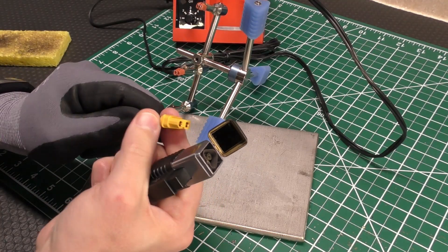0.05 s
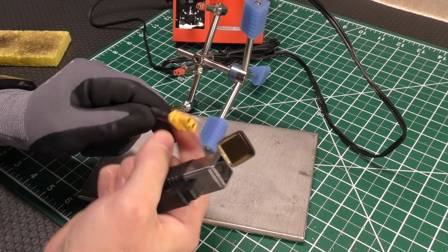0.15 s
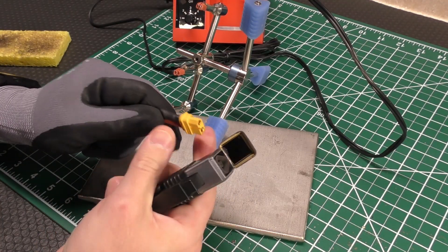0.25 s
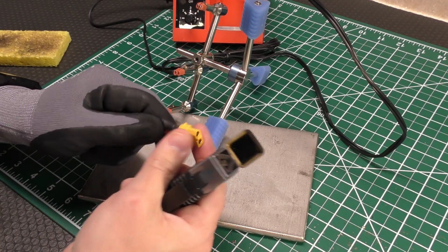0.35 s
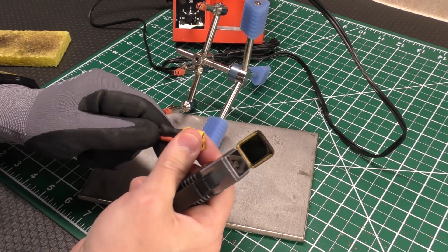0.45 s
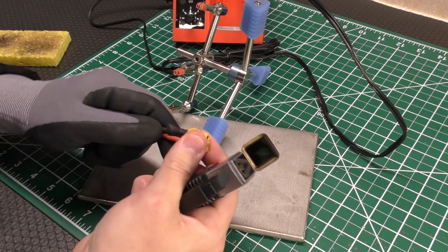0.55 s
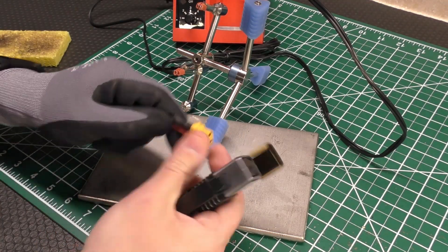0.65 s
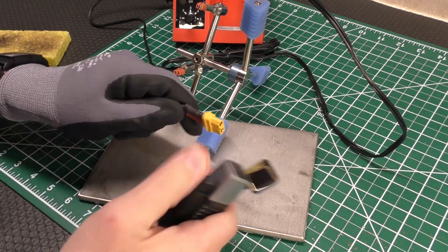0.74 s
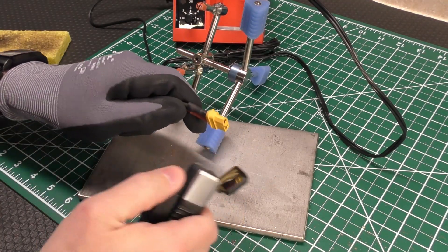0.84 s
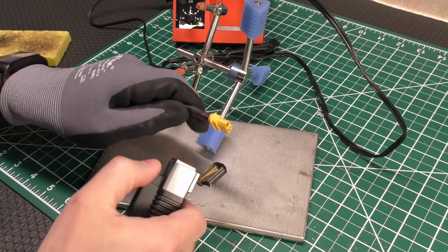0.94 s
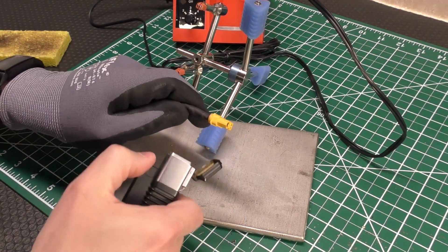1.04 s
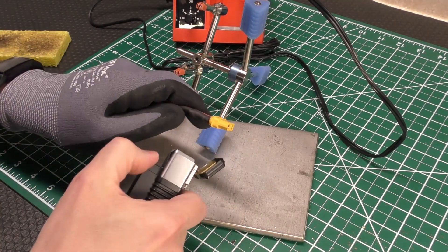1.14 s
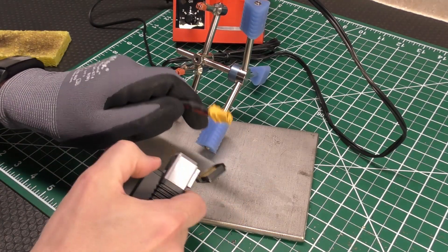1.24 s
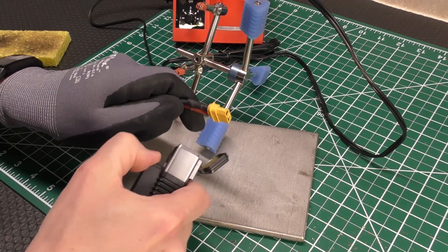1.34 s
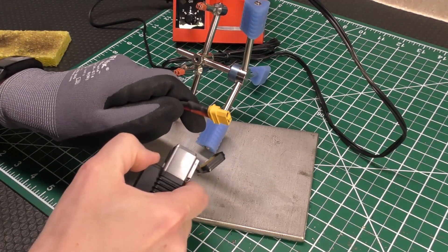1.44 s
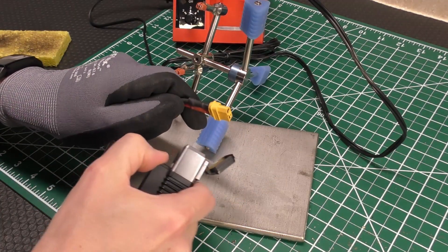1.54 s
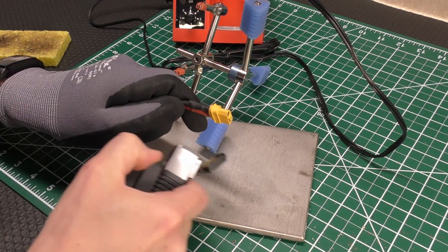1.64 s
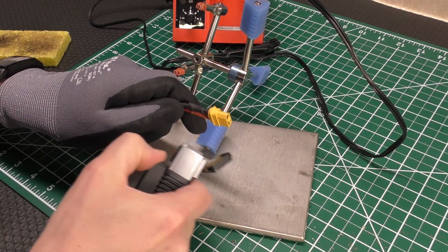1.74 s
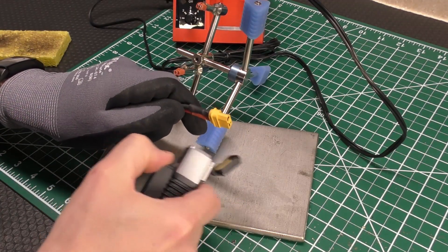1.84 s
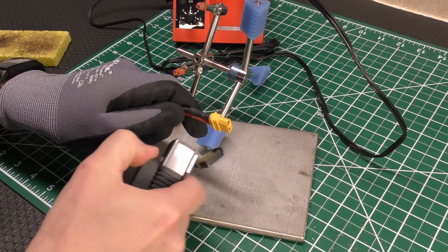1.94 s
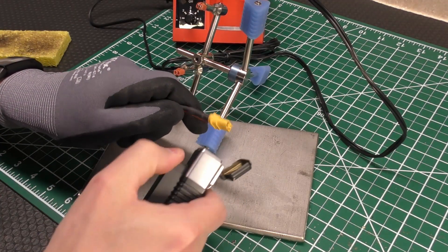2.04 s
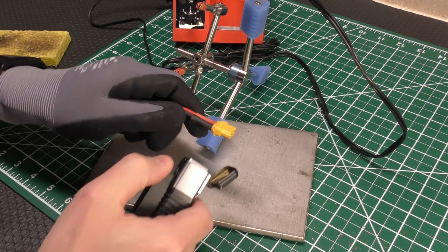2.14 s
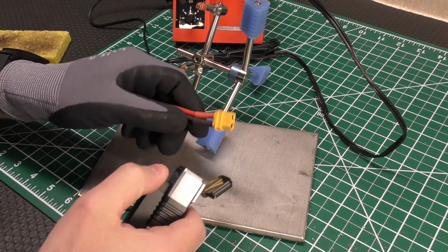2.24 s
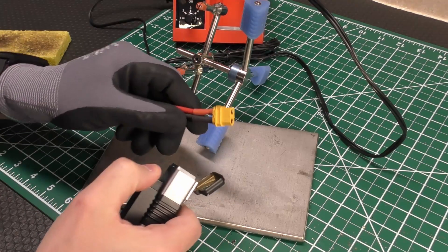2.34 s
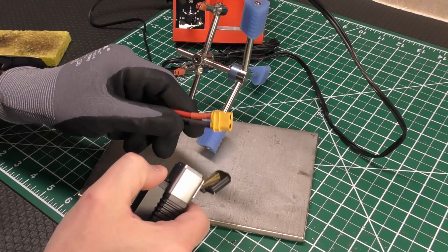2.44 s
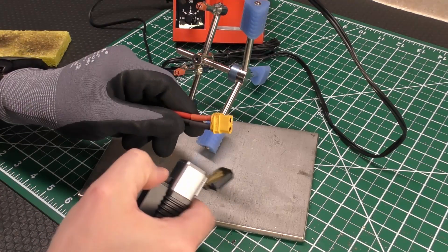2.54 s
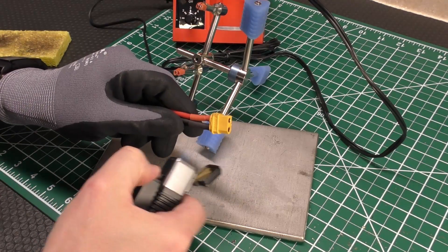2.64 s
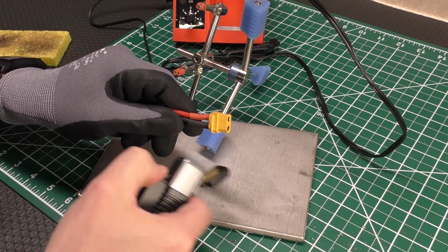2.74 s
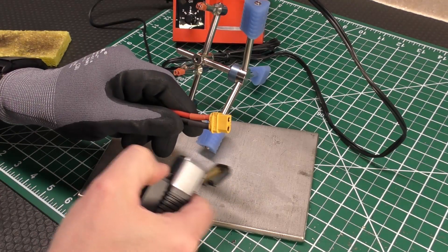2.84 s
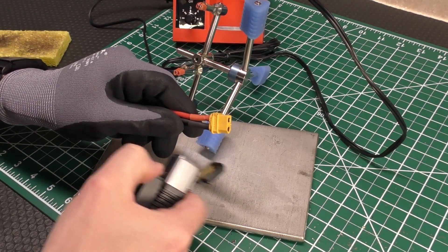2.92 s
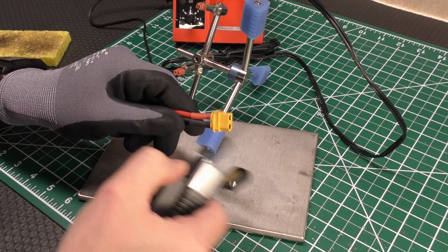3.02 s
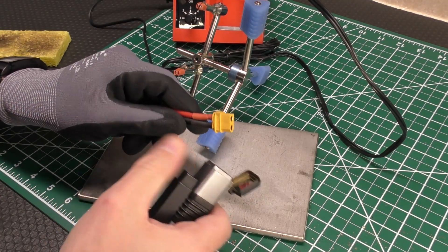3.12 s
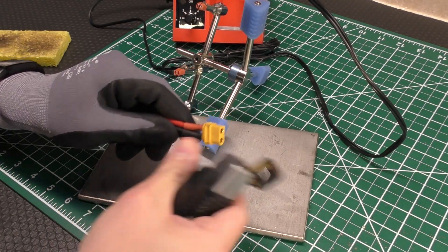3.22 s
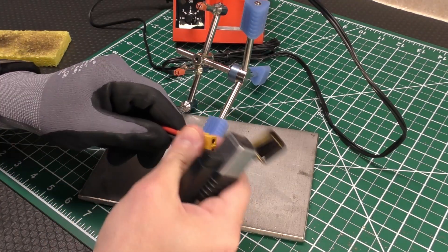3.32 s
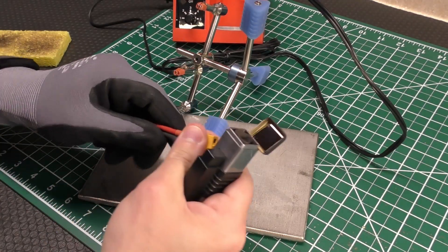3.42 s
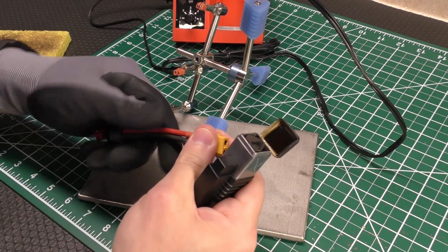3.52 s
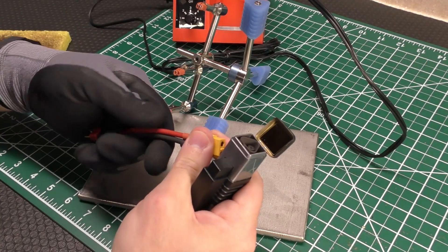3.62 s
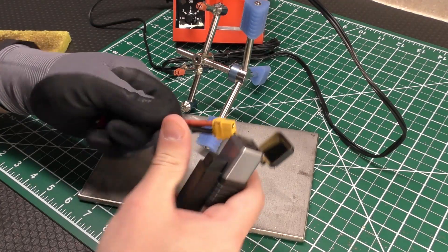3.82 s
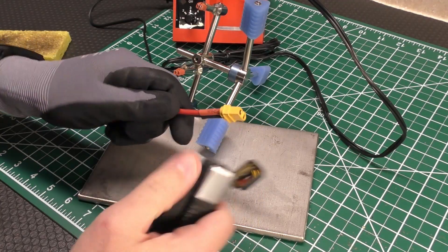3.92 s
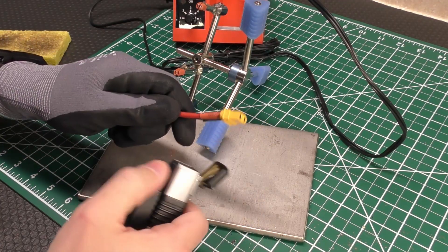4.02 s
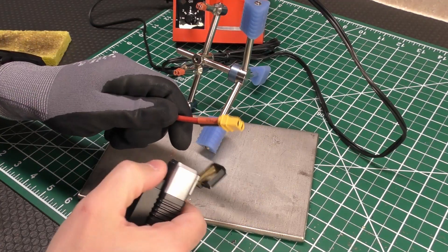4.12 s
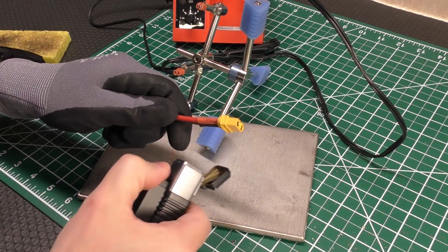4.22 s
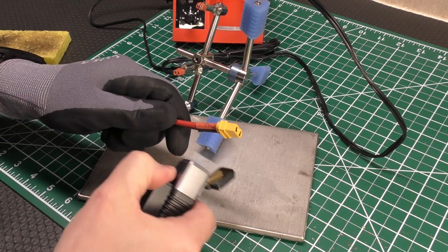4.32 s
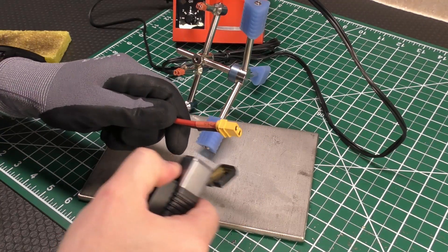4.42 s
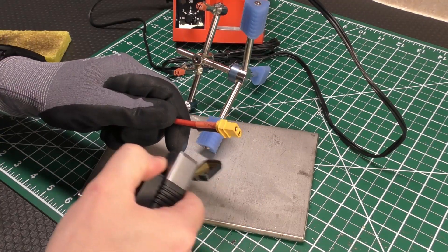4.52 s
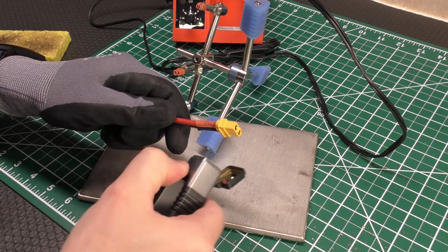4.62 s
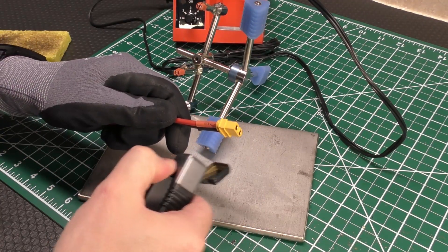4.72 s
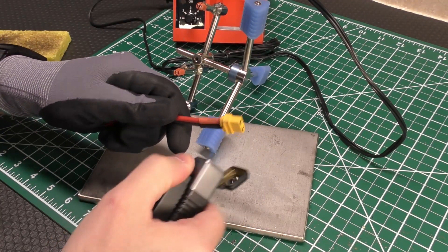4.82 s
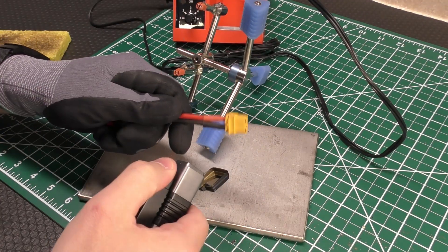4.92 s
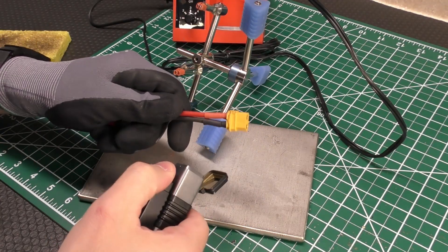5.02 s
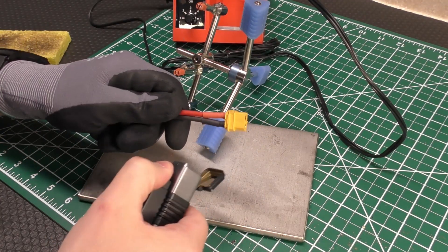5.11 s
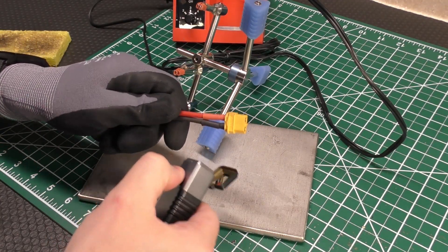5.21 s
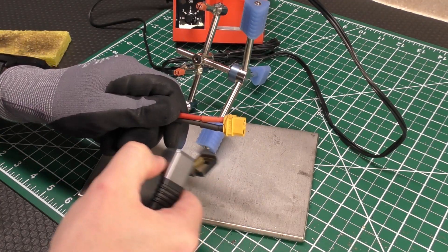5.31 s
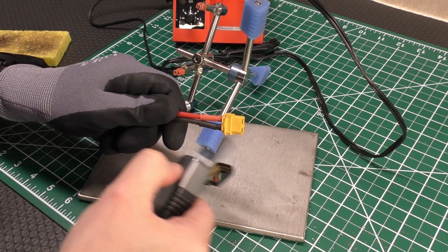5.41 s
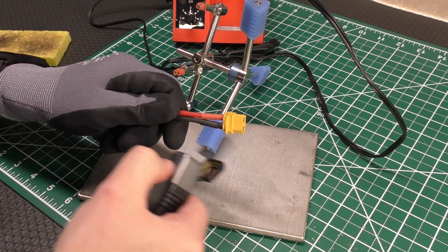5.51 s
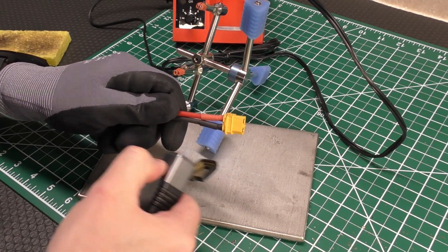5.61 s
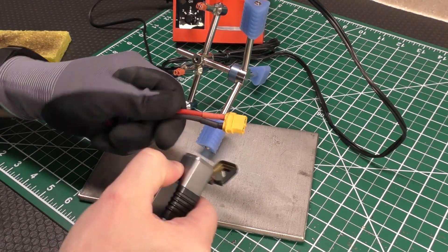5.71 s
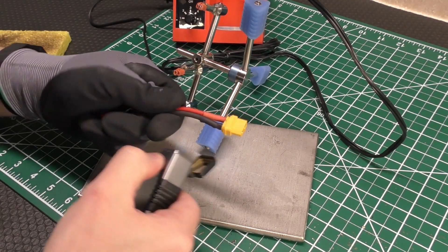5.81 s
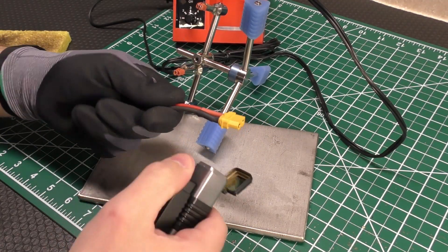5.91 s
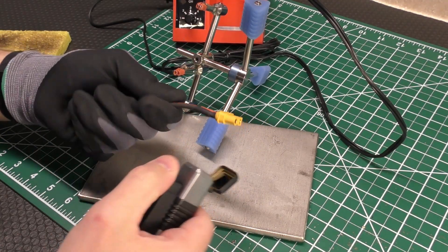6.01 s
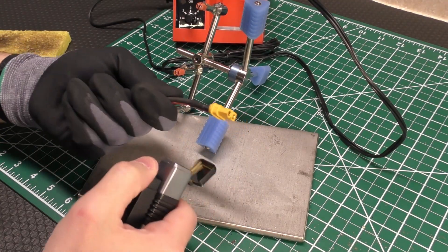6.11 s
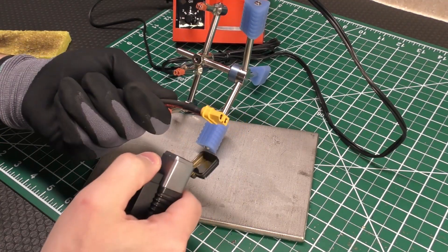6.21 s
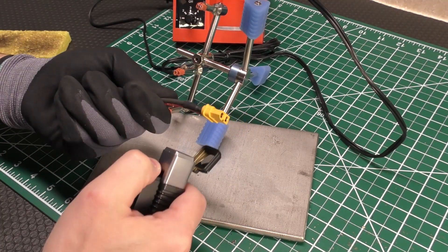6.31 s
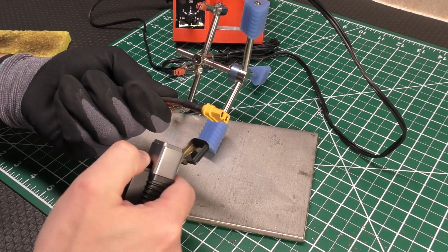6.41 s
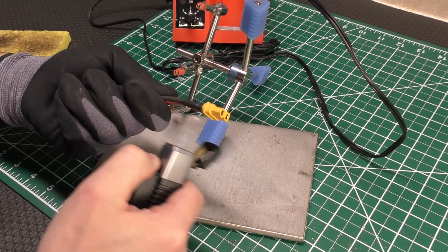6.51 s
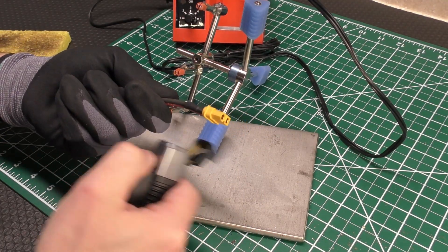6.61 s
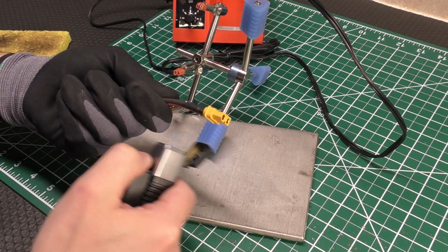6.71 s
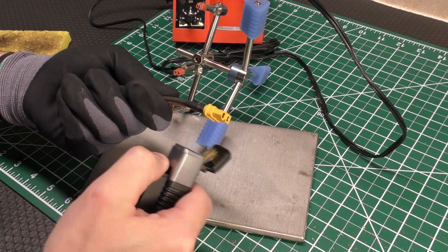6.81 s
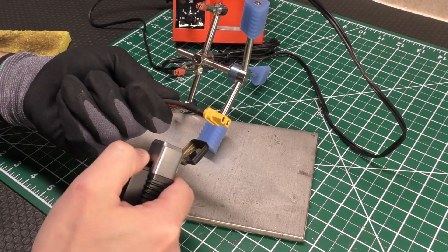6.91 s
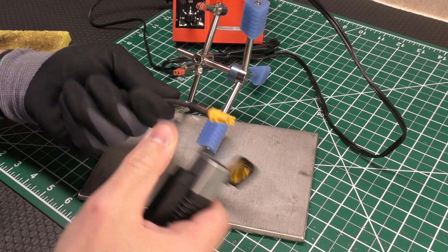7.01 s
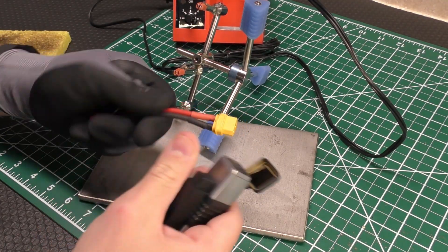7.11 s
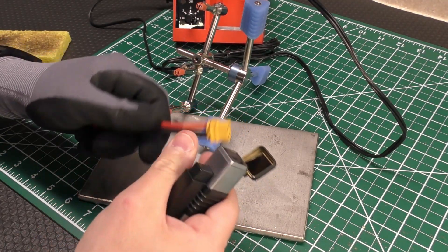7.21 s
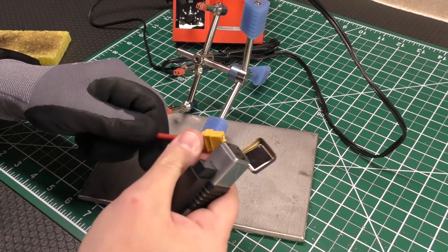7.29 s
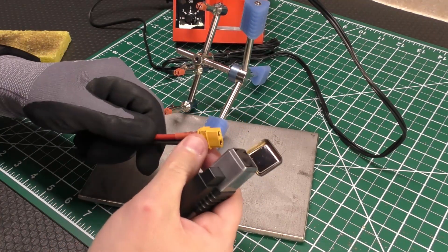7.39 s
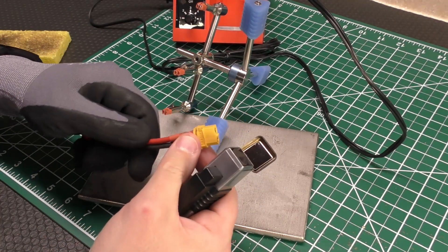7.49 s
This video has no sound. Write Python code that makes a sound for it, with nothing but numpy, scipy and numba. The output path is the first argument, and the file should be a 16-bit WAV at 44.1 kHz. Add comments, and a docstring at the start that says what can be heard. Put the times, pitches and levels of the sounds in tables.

```python
"""The jet flame of a torch lighter rushes and hisses over a workbench, close by, in five burns that shrink tubing.
Flame and gas are coloured turbulence noise; the hand swings the jet about six times a second, and it grows louder
and brighter at each pass over the connector. Each press snaps the piezo hammer (damped modes and noise bursts) and
the gas lights with a soft pop; each release clacks. Fabric rubs, a squeak, grip ticks, a fan and mains hum (noise
and sines) join in. The snaps scatter, a small room rings, and a limiter ducks the peaks."""
import sys
import numpy as np
from scipy import signal
from scipy.fft import rfft, irfft, next_fast_len
from scipy.io import wavfile
from scipy.ndimage import uniform_filter1d, minimum_filter1d, map_coordinates
from numba import njit

SR = 44100
rng = np.random.default_rng(int(sys.argv[2]) if len(sys.argv) > 2 else 0)


def to_wav(sig):
    """Store sig (one row per channel, or 1-D mono) as 16-bit WAV at the path in sys.argv[1].

    Samples outside -1..1 are clipped; the rate is SR.
    """
    pcm = np.clip(np.atleast_2d(sig), -1, 1) * 32767
    pcm = np.round(pcm).astype(np.int16)
    wavfile.write(sys.argv[1], SR, pcm.T)  # frames by channels


N = 332955
TIME = np.arange(N) / SR  # seconds
HIT = np.arange(4096) / SR  # time within one short blow, seconds

# Trigger pressed, the piezo hammer strikes. Each row: time in seconds, level in dB, pitch ratio of the case,
# hardness in dB, ping of the spring in Hz, ping level in dB.
HAMMER_STRIKES = [(1.3892, -5, 1.055, -1.5, 3100, -19), (2.562, -7, 1.055, 1.5, 2900, -29),
                  (4.3206, -5.5, 1.007, -1.5, 3930, -30), (5.255, -7.5, 1, 2.5, 1630, -22),
                  (6.3623, -5.5, 1.016, 0.5, 3380, -16)]
# Trigger let go, the valve shuts. Each row: time in seconds, level in dB, pitch ratio of the case,
# hardness in dB, ping of the spring in Hz, ping level in dB.
VALVE_CLOSINGS = [(2.1139, -23, 1.04, 1, 5120, -32), (3.1267, -28.5, 0.89, 5.5, 4180, -33),
                  (4.8930, -22, 1.18, -2, 5240, -26.5), (5.9110, -26.5, 0.94, 3, 4600, -25.5),
                  (7.0298, -21, 0.94, -2, 1650, -26)]


def undb(db):
    """Level law: decibels become an amplitude gain."""
    return 10 ** (np.asarray(db) / 20)


def unit(x):
    """Normalization: scale to rms 1."""
    return x / np.sqrt(np.mean(x ** 2))


def colour(x, points):
    """Minimum-phase filtering: folding the cepstrum makes the (Hz, dB) outline a causal filter."""
    size = next_fast_len(len(x) + len(HIT)) * 2
    hz, db = np.transpose(points)
    log_bins = np.log(np.fft.rfftfreq(size, 1 / SR) + 1)
    log_gain = np.log(undb(np.interp(log_bins, np.log(hz), db)))
    cepstrum = irfft(log_gain)
    cepstrum[1:size // 2] *= 2
    cepstrum[size // 2 + 1:] = 0
    response = np.exp(rfft(cepstrum))
    return irfft(rfft(x, size) * response)[:len(x)]


def noise(points):
    """Broadband source: white noise filtered to the (Hz, dB) outline, at rms 1."""
    return unit(colour(rng.standard_normal(N), points))


def walk(rate):
    """Slow fluctuation: random steps, rate per second, smoothed by a moving average to a spread near 1."""
    k = int(SR / rate)
    steps = np.repeat(rng.standard_normal(N // k + 1), k)
    return unit(uniform_filter1d(steps, k)[:N])


def stereo(mid, side):
    """Mid-side matrix: left is the sum, right the difference."""
    return np.array([mid + side, mid - side])


def add(track, s, sound):
    """Superposition: mix a sound in at a time in seconds."""
    i = int(s * SR)
    track[i:i + len(sound)] += sound[:N - i]


def burst(t60, t=HIT):
    """Exponential decay: noise that falls 60 dB in t60 seconds, with energy 1."""
    x = rng.standard_normal(len(t)) * undb(-60 * t / t60)
    return x / np.linalg.norm(x)


def gate(start, stop, rise, fall):
    """Linear envelope: 1 between two times, with sloping edges centred on them."""
    opening = np.clip((TIME - start) / rise + .5, 0, 1)
    closing = np.clip((stop - TIME) / fall + .5, 0, 1)
    return opening * closing


def background(air_db=-59, fan_db=-61, hum_db=-1, waver_db=-1.0, spread=0.47):
    """Steady noise and tones: a fan's low rush, thin air noise, and motor and mains tones that waver."""
    # Colour of the room air. Each row: frequency in Hz, level in dB.
    air_colour = [(25, -42), (48, 3.5), (80, -13.5), (120, 3.5), (180, -13), (250, -5.5), (470, -9.5),
                  (650, -18), (1190, -9.5), (2400, -15.5), (4000, -21.5), (6500, -35.5), (11500, -25.5),
                  (16000, -31)]
    # Colour of the fan's low rush. Each row: frequency in Hz, level in dB.
    fan_colour = [(60, -18), (110, -10), (220, -4.5), (330, -2.5), (480, -7), (560, -22.5), (800, -33)]
    # Mains and motor tones. Each row: frequency in Hz, level in dB before the common shift.
    hum_tones = [(59.2, -66), (118.4, -70), (150.7, -70.5), (220.7, -64.5), (301.5, -68.5), (479.1, -69),
                 (1168, -74.5)]
    mid, side = (undb(air_db) * noise(air_colour) + undb(fan_db) * noise(fan_colour) for _ in range(2))
    hum = 0
    for hz, db in hum_tones:
        level = undb(db + hum_db + waver_db * walk(5))
        hum = hum + level * np.sin(2 * np.pi * hz * TIME + .5 * walk(6))
    return stereo(mid + np.sqrt(2) * hum, spread * side)  # sqrt(2) turns tone levels into rms


def room(x, wet_db=-12, t60=0.46, side_db=-13):
    """Reverberation: steadier sounds convolved with decaying noise, the short ring of the walls."""
    mid, side = (signal.fftconvolve(x, burst(t60, TIME[:SR // 2]))[:N] for _ in range(2))
    return stereo(x + undb(wet_db) * mid, undb(side_db) * side)


def scatter(x, near_db=-12, near_t60=0.036, far_db=-16, far_t60=0.48, gap=0.0036, spread=0.46):
    """Diffuse scattering: a noise wash follows a snap's energy, quick off the bench, slower off the walls."""
    # Colour of a snap scattered by the bench and the walls. Each row: frequency in Hz, level in dB.
    wash_colour = [(300, -23), (800, -14), (1200, -5.5), (1550, 9), (2200, 4.5), (2700, 2.5), (3500, 2),
                   (5200, -2.5), (6300, 4), (7500, -2.5), (8700, -2.5), (9400, -3.5), (11500, -3.5),
                   (13700, -7), (16000, -15)]
    t = TIME[:SR // 2]
    near, far = undb(-120 * t / near_t60), undb(-120 * t / far_t60)  # energy, hence the doubled dB
    decay = undb(2 * near_db) * near / near.sum() + undb(2 * far_db) * far / far.sum()
    delayed_decay = np.pad(decay, (int(gap * SR), 0))
    energy = signal.fftconvolve(x ** 2, delayed_decay)[:N]
    wash = np.sqrt(np.abs(energy))
    return stereo(x + wash * noise(wash_colour), spread * wash * noise(wash_colour))


def ports(pair, lag=0.34, pan_db=0.9):
    """Interaural-style cues: the case is nearer the left microphone port, louder and lag samples earlier there."""
    right = map_coordinates(pair[1], [np.arange(N) - lag], order=3)
    return np.array([pair[0] * undb(pan_db / 2), right * undb(-pan_db / 2)])


def squeak(jitter=0.0083, rough_db=3):
    """Frequency modulation: as the grip changes, one thin unsteady tone arcs up and down."""
    # Path of the tone. Each row: time in seconds, pitch in Hz, level in dB.
    squeak_path = [(.58, 11700, -84), (.62, 12400, -77), (.71, 13400, -71), (.78, 12800, -65),
                   (.85, 11900, -66), (.89, 11400, -86)]
    s, hz, db = np.transpose(squeak_path)
    pitch = np.interp(TIME, s, hz) * (1 + jitter * walk(500))
    level = undb(np.interp(TIME, s, db) + rough_db * walk(60))
    phase = 2 * np.pi * np.cumsum(pitch) / SR
    return gate(s[0], s[-1], .02, .02) * level * np.sin(phase)


def rubs(grain_db=3):
    """Friction noise: glove and fingers on wire and case give short grainy swishes and duller scuffs."""
    # Strokes. Each row: start in seconds, length in seconds, swish level in dB, dull scuff level in dB.
    strokes = [(0.149, 0.056, -54, -69), (0.19, 0.082, -57, -80), (.67, 0.089, -66, -64),
               (1.24, 0.086, -61, -59), (3.494, 0.099, -72, -56.5), (3.82, .06, -67, -80),
               (7.34, 0.08, -65, -76.5)]
    # Colour of the swish. Each row: frequency in Hz, level in dB.
    swish_colour = [(1760, -48), (3000, -13), (4140, -3.5), (5330, -6), (7000, -0.5), (12100, -5),
                    (16000, -9)]
    # Colour of the scuff. Each row: frequency in Hz, level in dB.
    scuff_colour = [(500, -39), (1300, -2), (1900, 2), (2600, 1), (4000, -12), (9000, -24)]
    swish, scuff = np.zeros((2, N))
    for s, length, swish_db, scuff_db in strokes:
        stroke = np.hanning(int(length * SR))
        add(swish, s, undb(swish_db) * stroke)
        add(scuff, s, undb(scuff_db) * stroke)
    grain = unit(undb(grain_db * walk(600)))
    return (swish * noise(swish_colour) + scuff * noise(scuff_colour)) * grain


def snaps(table, crack_db, crack_t60, rattle_db, rattle_t60, steel_db):
    """Impact excites modes: the damped case rings briefly, metal cracks, the spring rattles, steel rings on."""
    # Modes of the hand-damped case. Each row: frequency in Hz, swell time in seconds, level in dB.
    case_modes = [(1694, 0.00079, 0.5), (2320, 0.00057, -4), (3107, 0.00063, -4.5), (3660, 0.0005, -8),
                  (4940, 0.0004, -6.5), (6670, 0.0012, -20.5), (9860, 0.00023, -23), (11240, 0.00024, -1)]
    # Colour of the crack of the metal parts. Each row: frequency in Hz, level in dB.
    crack_colour = [(300, -27), (900, -13), (1500, -20), (3200, -4), (4200, -0.5), (5400, -4), (6500, -0.5),
                    (7600, -3.5), (9000, -1), (12000, -4), (13000, -6), (15500, -9), (17000, -3.5)]
    # Thin steel parts. Each row: frequency in Hz, level in dB, 60 dB decay time in seconds.
    steel_modes = [(1450, -22, .04), (2060, 5, 0.095), (2120, -12, 0.036), (3500, -15, .05),
                   (5080, 8, 0.044), (5860, -17, .15), (6500, -14, .15), (6900, -24, 0.12),
                   (7260, -11, .13), (8380, 1, .1), (8930, -22, .1), (11900, 9, .06)]
    out = np.zeros(N)
    contact = 1 - np.exp(-HIT / 0.00021)  # softens the onset of the crack
    t = TIME[:SR // 4]
    for s, db, pitch, hardness_db, *_ in table:
        ring = 0  # a harder contact lifts the high modes and the crack
        for k, (hz, swell, mode_db) in enumerate(case_modes):
            shape = (HIT / swell * np.exp(1 - HIT / swell)) ** 2
            level = undb(mode_db + hardness_db * hz / case_modes[-1][0])
            ring = ring + (-1) ** k * level * shape * np.sin(2 * np.pi * hz * pitch * HIT)
        steel = 0
        for hz, mode_db, t60 in steel_modes:
            level = undb(mode_db + 2 * rng.standard_normal() - 60 * t / t60)
            steel = steel + level * np.sin(2 * np.pi * (hz * t + rng.random()))
        metal = undb(crack_db) * burst(crack_t60) * contact + undb(rattle_db) * burst(rattle_t60)
        add(out, s, undb(db) * (ring + undb(hardness_db) * colour(metal, crack_colour)))
        add(out, s, undb(db + steel_db) * steel)
    return out


def pings(table, t60):
    """Damped free oscillation: the trigger spring gives one short note, its own for each snap."""
    out = np.zeros(N)
    for s, *_, hz, db in table:
        add(out, s, undb(db - 60 * HIT / t60) * np.sin(2 * np.pi * hz * HIT))
    return out


def grip_ticks():
    """Weak impacts: the case ticks as the grip shifts, and the trigger slips just before every release."""
    # Ticks of the case. Each row: time in seconds, level in dB, pitch ratio of the case, hardness in dB.
    shifts = [(.859, -43, 0.93, 0), (1.2655, -53, 0.88, 17), (4.0012, -39, 0.93, -8.5),
              (4.0765, -43, 1.45, -21), (5.114, -43.5, 1.08, -25), (6.199, -50.5, 1, -15.5),
              (6.2635, -43.5, 1.07, -20)]
    slip_lead_s, slip_db, slip_hardness_db = .038, -53, 14
    slips = [(s - slip_lead_s, slip_db, 1, slip_hardness_db) for s, *_ in VALVE_CLOSINGS]
    return snaps(shifts + slips, crack_db=15, crack_t60=0.019, rattle_db=17.5, rattle_t60=0.11, steel_db=-39)


def flame_outs(thud_hz=200, thud_db=-41, thud_t60=0.053):
    """Damped low oscillation: the flame dies with a small dull thud."""
    out = np.zeros(N)
    for s, *_ in VALVE_CLOSINGS:
        add(out, s, undb(thud_db - 60 * HIT / thud_t60) * np.sin(2 * np.pi * thud_hz * HIT))
    return out


def ignitions(delay=0.00647, width=.0019, pop_hz=195, pop_db=-17.5, boom_db=-40, boom_t60=0.26):
    """Thermal expansion: the gas catches after each spark, a smooth push and pull of air, then a low boom."""
    # Low modes of the room. Each row: frequency in Hz, level in dB, 60 dB decay time in seconds.
    low_modes = [(133, -41, 0.38), (213, -57, 0.12), (300, -41, 0.072)]
    # Colour of the boom. Each row: frequency in Hz, level in dB.
    boom_colour = [(40, -30), (90, -10), (130, 1), (260, 2.5), (400, -6.5), (900, -50)]
    t = TIME[:SR // 2]
    pop = -np.sin(2 * np.pi * pop_hz * (t - delay)) * np.exp(-((t - delay) / width) ** 2 / 2)
    pop = colour(pop, [(30, -27), (75, -6.0), (120, -7), (1000, -5)])
    ring = sum(undb(db - 60 * t / t60) * np.sin(2 * np.pi * hz * t) for hz, db, t60 in low_modes)
    direct, swell = np.zeros((2, N))
    for s, *_ in HAMMER_STRIKES:
        add(direct, s, undb(pop_db) * pop)
        add(direct, s + delay, -ring)
        add(swell, s + delay, undb(boom_db - 60 * t / boom_t60))
    mid, side = (swell * noise(boom_colour) for _ in range(2))
    return stereo(direct + mid, .5 * side)


def plate(x, sway=.00005):
    """Comb filtering: nearby surfaces reflect the flame over paths that waver with the hand, rippling the hiss."""
    # Reflections off the plate, the mat and the tools. Each row: mean delay in seconds, level in dB.
    reflections = [(.0007, -24), (.0029, -24), (.0046, -20), (.0067, -17)]
    out = x
    for delay, db in reflections:
        arrival = (TIME - delay - sway * walk(3)) * SR
        out = out + undb(db) * map_coordinates(x, [arrival], order=1)
    return out


def bounce(x, delay=.0019, echo_db=-8, sway=.00002):
    """Interference: a strong echo off the steel plate, its delay swaying, combs treble into whistly streaks."""
    echo = map_coordinates(x, [(TIME - delay - sway * walk(8)) * SR], order=3)
    return unit(x + undb(echo_db) * echo)


def waving(spark, passes, wave_hz, off_centre, approach, out, back, edge=5):
    """Harmonic motion: the hand swings like a pendulum, the jet crossing the connector twice per wave."""
    target_width = 0.83  # half-width of the connector as a share of the swing
    reach_s = 0.086  # time to bring the flame within reach
    phase = 2 * np.pi * wave_hz * (TIME - passes)
    across = off_centre + np.sin(phase)
    aim = np.interp(np.cos(phase), [-.5, .5], [back, out])
    within_reach = np.clip((TIME - spark - approach) / reach_s + .5, 0, 1)
    return within_reach * aim * np.exp(-np.abs(across / target_width) ** edge)


def flame(rush_db=-50, rush_swell_db=5, cup_swell_db=8, hiss_db=-63, hiss_swell_db=18.5, flutter_db=1.13,
          sputter_db=2.0, rise=0.09, tremor=.07, leak_db=-61):
    """Jet turbulence: rush, ringing burner cup and, most of all, hiss swell where the jet meets the connector."""
    # Burns. Each row: gas flow before the spark in seconds, base level of the cup in dB, nozzle hiss in dB.
    burns = [(0.18, -48, -65), (0.069, -48, -62.5), (0.045, -47, -61), (0.047, -47.5, -60.5),
             (.04, -46, -59)]
    # Swings of the hand, one row per burn. Each row: time in seconds when an outward stroke passes mid-swing,
    # waves in Hz, off-centre as a share of the swing, delay from spark to within reach in seconds,
    # how squarely the jet hits going out (0-1), the same coming back (0-1).
    swings = [(1.880, 6.1, -.09, .22, .72, .45), (2.903, 5.81, -.05, .02, .82, .64),
              (4.643, 5.88, -.13, .2, .68, .7), (5.742, 5.96, -.07, .11, .78, .64),
              (6.675, 5.98, -.035, .13, .88, .66)]
    # Colours of the rush of the flame, the resonance of the burner cup, the hiss of the jet, the gas leaving
    # the nozzle, and unlit gas whistling through the half-open valve. Each row: frequency in Hz, level in dB.
    rush_colour = [(60, -21.5), (130, -10), (310, -1.5), (500, -4), (700, -14), (850, -8), (1010, -1),
                   (1200, -14.5), (2000, -15.5), (3200, -15), (4200, -31), (6000, -39.5)]
    cup_colour = [(900, -19.5), (1250, -4.5), (1680, 4), (1950, -2), (2250, 2.5), (2700, -11.5),
                  (3500, -17), (4500, -22.5), (6000, -39)]
    hiss_colour = [(1500, -14.5), (2600, 2), (3200, 0.5), (3900, 1), (4900, 0.5), (5900, -10.5), (7100, -6),
                   (8500, -15.5), (11000, -12.5), (16000, -30)]
    nozzle_colour = [(4000, -33), (8000, -5), (12000, -5), (13700, 1.5), (14500, -3), (16000, -3.5)]
    valve_colour = [(2000, -0.5), (5500, -6.5), (6700, -7), (7200, 1), (8200, -11), (9500, -2), (10400, 1),
                    (11500, -6), (16000, -25)]
    contact, lit, cup, gas, leak = np.zeros((5, N))
    for strike, closing, burn, swing in zip(HAMMER_STRIKES, VALVE_CLOSINGS, burns, swings):
        spark, shut = strike[0], closing[0]
        lead, cup_db, nozzle_db = burn
        burning = gate(spark + rise / 2, shut + 0.0069, rise, 0.0086)
        contact += (burning > 0) * waving(spark, *swing)
        lit += burning
        cup += burning * undb(cup_db)
        gas += burning * undb(nozzle_db)
        leak += gate(spark - lead, spark, 0.019, .006) * undb(leak_db)
    contact *= 1 + tremor * walk(60)  # the aim is never quite steady
    rush = lit * noise(rush_colour) * undb(rush_db + rush_swell_db * contact)
    cup_ring = cup * noise(cup_colour) * undb(cup_swell_db * contact)
    hiss_level = undb(hiss_db + hiss_swell_db * contact + sputter_db * walk(250))
    hiss = lit * bounce(noise(hiss_colour)) * hiss_level
    jet = (rush + cup_ring + hiss) * undb(flutter_db * walk(70))
    return jet + gas * bounce(noise(nozzle_colour)) + leak * noise(valve_colour)


def scene():
    """Superposition: snaps, ignition, jet and handling over the room's own noise."""
    press = snaps(HAMMER_STRIKES, crack_db=20.0, crack_t60=0.0068, rattle_db=0.5, rattle_t60=0.07, steel_db=-31.0)
    release = snaps(VALVE_CLOSINGS, crack_db=20.5, crack_t60=0.0078, rattle_db=20, rattle_t60=0.12, steel_db=-25)
    springs = pings(HAMMER_STRIKES, t60=0.018) + pings(VALVE_CLOSINGS, t60=0.024)
    lighter = ports(scatter(press + release + springs + flame_outs() + grip_ticks()))
    steady = room(plate(flame()) + rubs() + squeak())
    return lighter + ignitions() + steady + background()


@njit
def recover(cut_db, keep):
    """Attack and release: the gain drops at once and creeps back exponentially in dB."""
    out, held = np.empty(len(cut_db)), 0.
    for i in range(len(cut_db)):
        held = min(cut_db[i], held * keep)
        out[i] = held
    return out


def record(dry, ceiling_db=-10, recovery=0.13, rail=0.74, top_hz=16100):
    """Limiting: gain ducks under loud peaks and recovers slowly; tall peaks are rounded and the top is cut."""
    power = uniform_filter1d(np.mean(dry ** 2, axis=0), size=111)
    cut_db = np.minimum(0, ceiling_db - 10 * np.log10(np.abs(power) + 1e-12))
    ahead = minimum_filter1d(cut_db, size=129)  # looks 64 samples ahead
    held_db = recover(ahead, np.exp(-1 / (recovery * SR)))
    gain = undb(uniform_filter1d(held_db, size=65))
    rounded = rail * np.tanh(dry * gain / rail)
    low_pass = signal.ellip(8, .2, 70, top_hz, fs=SR, output="sos")
    return signal.sosfilt(low_pass, rounded)


dry = scene()
out = record(dry)
to_wav(out)
```